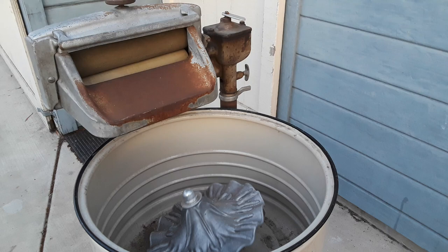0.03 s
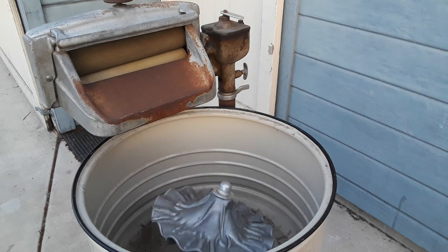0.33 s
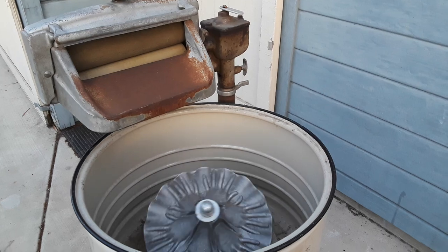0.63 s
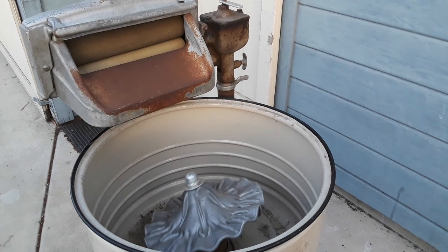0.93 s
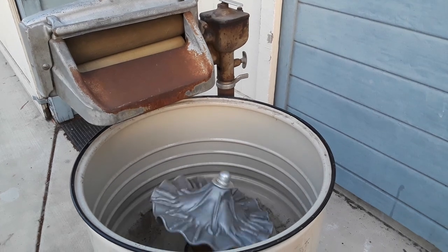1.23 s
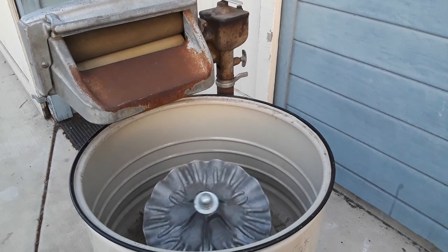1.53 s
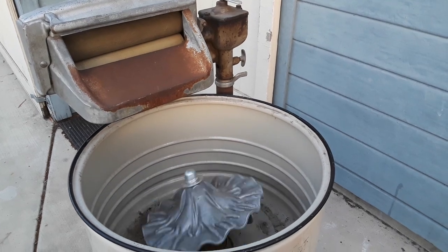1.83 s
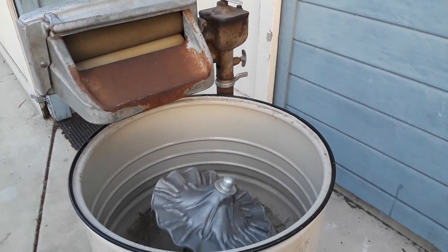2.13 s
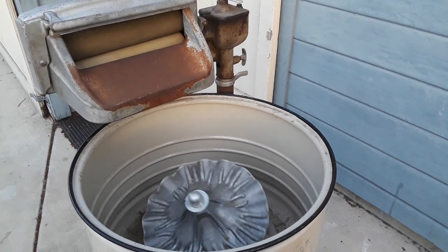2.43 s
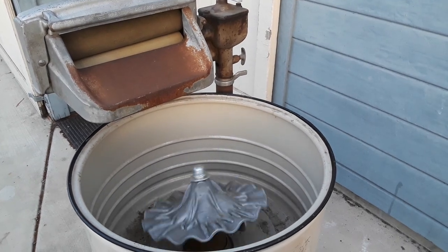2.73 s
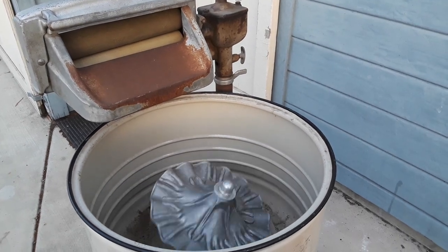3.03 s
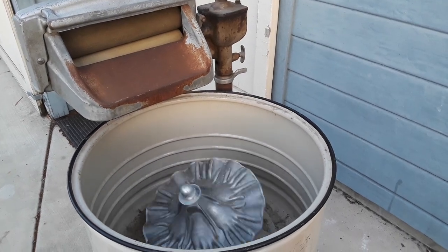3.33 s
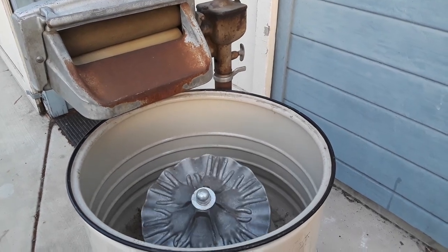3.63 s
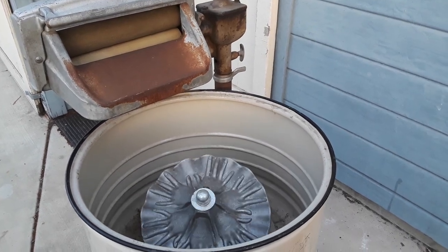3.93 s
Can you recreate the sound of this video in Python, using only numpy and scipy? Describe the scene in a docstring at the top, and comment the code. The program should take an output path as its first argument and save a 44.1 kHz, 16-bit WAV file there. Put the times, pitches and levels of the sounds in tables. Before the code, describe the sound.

An old wringer washer runs empty, droning and churning while a loose metal part chinks.

```python
"""Old wringer washer running empty

Outdoors, from just above the tub. The motor hums and the gear drive makes the tub drone,
swelling as the agitator swings. The gearbox churns, grinds and knocks softly, and its noise
rings the cabinet panels. Close on the left a small loose metal part chinks in irregular
groups over its own faint jingle. A short click comes just before the sound cuts off."""
import sys
import numpy as np
from scipy import signal
from scipy.fft import rfft, irfft
from scipy.io import wavfile

SR = 44100
rng = np.random.default_rng(int(sys.argv[2]) if len(sys.argv) > 2 else 0)


def waveform_to_disk(signal):
    """Save audio, clipped to [-1, 1], as 16-bit WAV at the path in sys.argv[1]."""
    frames = np.transpose(np.atleast_2d(signal))
    scaled = np.clip(frames, -1, 1) * 32767
    samples = np.round(scaled).astype(np.int16)
    wavfile.write(sys.argv[1], SR, samples)


N = 176400
TIME = np.arange(N) / SR
TOP_HZ = 15950

# The motor's steady tones. Each row: frequency in Hz, level in dB.
MOTOR_TONES = [(41,-67.5),(120,-55)]
# Surges of load as the agitator swings. Each row: middle in seconds, length in seconds, relative dB.
LOAD_SURGES = [(0.148,0.071,-26),(0.35,0.055,-32.5),(0.441,0.045,-33),(0.55,0.013,-29),(0.644,0.063,-25.5),(0.823,0.09,-31),(1.117,0.11,-32),(1.308,0.056,-30),(1.537,0.073,-26),(1.737,0.071,-35),(1.95,0.024,-29),(2.022,0.051,-26.5),(2.298,0.031,-32.5),(2.423,0.016,-28.5),(2.465,0.022,-28.5),(2.523,0.047,-28),(2.711,0.061,-31.5),(2.855,.042,-31),(2.93,0.043,-29),(3.005,0.042,-31.5),(3.279,0.052,-36),(3.358,0.022,-28),(3.405,0.01,-28),(3.463,0.04,-29.5),(3.918,0.16,-39)]
# Panel resonances. Each row: pitch in Hz, half-width in Hz, level in dB, left over right in dB.
PANEL_MODES = [(141.2,5.9,-48.5,0.5),(173.4,13.7,-46.5,-0.5),(399.8,13.6,-53.5,-1.5),(605.3,13.3,-54.5,2),(846,5.3,-71.5,18),(1219,21,-61.5,6),(1332,14,-64.5,-1),(1728,25,-66.5,6),(1950,57,-66,-12.5),(2276,43,-63,0)]
# Tone of the churning gears. Each row: frequency in Hz, relative level in dB.
CHURN_EQ = [(30,-20),(42,-14),(62,-4.5),(90,1.5),(125,9.5),(185,2),(225,1.5),(350,2.5),(470,-3.5),(850,-4.5),(1250,-5.5),(2300,-12),(2800,-17.5),(3500,-24.5),(4400,-23.5),(5300,-33),(7300,-27.5),(8800,-45.5),(16000,-39)]
# Fader ride on the churn. Each row: time in seconds, level in dB.
CHURN_FADER = [(.08,-43.5),(.22,-42),(.36,-44.5),(.62,-42.5),(.72,-42.5),(.85,-41),(.95,-43),(1.3,-42.5),(1.62,-45),(1.95,-41.5),(2.05,-42.5),(2.25,-43),(2.45,-44.5),(2.72,-43),(3.12,-43.5),(3.48,-41),(3.6,-45),(4,-43)]
# Lean of the gear noise. Each row: frequency in Hz, left over right in dB.
GEAR_PAN = [(30,0.5),(2300,-1),(3300,8.5),(4500,10.5),(9000,7),(13000,0)]
# Stereo width of the gear noise. Each row: frequency in Hz, side over mid in dB.
GEAR_WIDTH = [(30,-17),(140,-35),(330,-15),(700,-10.5),(1300,-2),(2000,-0.5)]
# Tone of the loose part at each ear. Each row: frequency in Hz, relative level in dB.
METAL_EQ_LEFT = [(1760,-54),(3000,-6),(3500,-26),(4020,-9),(4440,-4),(4900,-15),(5470,-20),(6460,-15),(7050,2),(7430,-2),(8480,-20),(9100,-22.5),(10400,-14),(11100,-4.5),(12600,1),(13700,-6.5),(15100,-13),(15900,-9.5)]
METAL_EQ_RIGHT = [(2800,-29),(4500,1),(5300,-12),(6500,-3),(7250,7.5),(8700,-15),(10800,3.5),(12600,5),(15800,-28)]
# Soft knocks of the drive, except the last row: a short click just before the sound cuts off.
# Each row: start in seconds, relative level in dB, emphasis in Hz.
KNOCK_AND_CLICK_CUES = [(.092,-46,950),(0.151,-48,2000),(.383,-50,1030),(0.423,-51.5,1160),(0.604,-49,2350),(0.841,-51,2300),(1.437,-44,1180),(1.466,-50,2160),(1.516,-48,2330),(2.135,-44,1820),(2.18,-48,1520),(2.238,-49.5,2000),(2.658,-50,1973),(2.889,-47.5,1520),(3.24,-51.5,2235),(3.333,-52.5,1220),(3.442,-46.5,900),(3.868,-51,1998),(3.963,-44.5,2070)]
# Tone of knocks and grinding inside the tub. Each row: frequency in Hz, relative level in dB.
TUB_EQ = [(200,-22),(600,2.5),(1200,2.5),(1800,-1.5),(2350,5),(3000,-8.5),(4500,-18.5),(8000,-28),(16000,-42)]
# Chinks of the loose part. Each row: start in seconds, relative level in dB.
CHINK_CUES = [(.213,-52),(.260,-50),(0.297,-38.5),(0.323,-53),(.380,-47),(0.442,-43.5),(0.638,-50.5),(.705,-41),(0.881,-38.5),(0.923,-46),(0.944,-39),(1.042,-43.5),(1.131,-45),(1.169,-44),(1.209,-42),(1.369,-53),(1.403,-44.5),(1.451,-43),(1.604,-44),(1.633,-49),(1.656,-40),(1.796,-46.5),(1.819,-44.5),(1.899,-38.5),(1.941,-38),(1.977,-43),(2.088,-45.5),(2.111,-44.5),(2.164,-40),(2.244,-49.5),(2.385,-37),(2.420,-36.5),(2.534,-43),(2.558,-39.5),(2.588,-43),(2.682,-37.5),(2.847,-44),(2.859,-39),(2.895,-41),(2.923,-45.5),(3.036,-49.5),(3.134,-43),(3.322,-33),(3.367,-38),(3.396,-51),(3.499,-44.5)]
# The part's clearest partials. Each row: frequency in Hz, relative level in dB.
METAL_MODES = [(4348,-18),(4490,-24),(4600,-16),(5950,-9),(7130,-39),(7290,-26),(11698,-32),(12111,-30)]
# Spells of grinding. Each row: middle in seconds, length in seconds, level in dB, emphasis in Hz.
GRIND_CUES = [(0.423,.035,-55,1150),(0.818,0.1,-48,910),(2.22,0.06,-43.5,950),(2.581,0.16,-51.5,2100),(2.853,0.066,-45,1095),(3.471,0.076,-55,1700)]

METAL_T60_S = 0.13  # decay of the part's dense ring


def amp(db):
    """Decibels to gain."""
    return 10 ** (np.asarray(db) / 20)


def unit(x):
    """Scales to rms 1."""
    return x / np.sqrt(np.mean(abs(x) ** 2) + 1e-20)


def read(points, hz):
    """Reads a table on a log-frequency axis."""
    f, value = np.transpose(points)
    return np.interp(np.log(hz + 1), np.log(f + 1), value)


def add(mix, start_s, sound):
    """Drops a stereo sound into the mix."""
    part = mix[:, round(start_s * SR):][:, :sound.shape[1]]
    part += sound[:, :part.shape[1]]


def equalise(x, eq):
    """Runs x through an EQ curve; rms 1."""
    n = x.shape[-1]
    return unit(irfft(rfft(x) * amp(read(eq, np.fft.rfftfreq(n, 1 / SR))), n))


def wander(rate_hz):
    """Smooth random motion, rms 1."""
    hz = np.fft.rfftfreq(N, 1 / SR)
    return unit(irfft(rfft(rng.standard_normal(N)) / (1 + (hz / rate_hz) ** 4), N))


def spread(pair, gain):
    """Filters two unrelated signals into stereo, tight in the bass and wide in the treble; rms 1."""
    hz = np.fft.rfftfreq(N, 1 / SR)
    mid, side = rfft(pair)
    width, pan = amp(read(GEAR_WIDTH, hz)), amp(read(GEAR_PAN, hz) / 2)
    ears = np.array([(mid + width * side) * pan, (mid - width * side) / pan])
    return unit(irfft(ears * gain / np.hypot(1, width), N))


def swell(middle_s, length_s):
    """A bell-shaped rise and fall."""
    return np.exp(-2 * ((TIME - middle_s) / length_s) ** 2)


def tub_drone(idle_hz=149.5, bend_hz=11, jitter_hz=3, rough=0.22, rough_hz=32):
    """The tub's low ring, shaken unevenly by the gears, lifts in level and pitch with each surge."""
    load = sum(amp(db) * swell(middle, length) for middle, length, db in LOAD_SURGES)
    bend = bend_hz * load / (load + amp(-36))  # half the bend at a load of -36 dB
    hz = idle_hz + bend + jitter_hz * wander(rough_hz)
    shake = 1 + rough * (wander(rough_hz) + 1j * wander(rough_hz)) / np.sqrt(2)
    ring = unit((shake * np.exp(2j * np.pi * np.cumsum(hz) / SR)).real)
    level = np.hypot(load, amp(-43)) * amp(-3)  # the floor keeps it droning between surges
    return level * ring


def motor_hum():
    """The motor holds a steady low hum."""
    return sum(amp(db) * unit(np.sin(2 * np.pi * (hz * TIME + rng.random()))) for hz, db in MOTOR_TONES)


def cabinet_ring(sway_db=1.5, sway_hz=5):
    """Gear noise rings the panels, each resonance swelling and fading on its own."""
    hz, out = np.fft.rfftfreq(N, 1 / SR), np.zeros((2, N))
    for pitch, width, db, pan_db in PANEL_MODES:
        resonance = 1 / (1 + ((hz - pitch) / width) ** 2)
        ring = spread(rng.standard_normal((2, N)), resonance)
        ear_gains = amp([[db + pan_db / 2], [db - pan_db / 2]])
        out += unit(ring * amp(sway_db * wander(sway_hz))) * ear_gains
    return out


def gear_churn(grit_per_s=160, grit_db=-7.5, grit_decay_s=0.0039, flicker_db=1.25, flicker_hz=30):
    """Rubbing noise and a grit of small tooth impacts come through the gear housing."""
    hz = np.fft.rfftfreq(N, 1 / SR)
    hits = (rng.random(N) < grit_per_s / SR) * amp(3 * np.minimum(rng.exponential(1, N), 3))
    envelope = signal.lfilter([1], [1, -np.exp(-1 / (grit_decay_s * SR))], hits)
    grit = unit(envelope * rng.standard_normal((2, N)))
    rubbing = rng.standard_normal((2, N))
    churn = spread(rubbing + amp(grit_db) * grit, amp(read(CHURN_EQ, hz)))
    fader_db = np.interp(TIME, *np.transpose(CHURN_FADER))
    return churn * amp(fader_db + flicker_db * wander(flicker_hz))


def metal_tone(pair, right_db=-12.5):
    """Gives a sound the loose part's bright colour and places it on the left."""
    left, right = equalise(pair[0], METAL_EQ_LEFT), equalise(pair[1], METAL_EQ_RIGHT)
    return np.array([left, amp(right_db) * right])


def metal_jingle(touches_per_s=70, left_db=-66, settle_s=0.17, end_s=3.6):
    """The loose part trembles faintly under the chinks until it settles."""
    touches = (rng.random(N) < touches_per_s / SR) * amp(3 * np.minimum(rng.exponential(1, N), 2))
    power = signal.lfilter([1], [1, -amp(-120 / (METAL_T60_S * SR))], touches ** 2)
    shimmer = metal_tone(np.sqrt(power) * rng.standard_normal((2, N)))
    fade = np.clip((end_s - TIME) / settle_s, 0, 1)
    return amp(left_db) * shimmer * fade


def tub_tone(x, emphasis_hz, boost_db=8, octaves=0.9):
    """Gives a sound the tub's colour, with a broad bell boost; rms 1."""
    hz = np.geomspace(100, SR / 2, num=100)
    bell_db = boost_db * np.exp(-(np.log2(hz / emphasis_hz) / octaves) ** 2)
    return equalise(x, np.transpose([hz, read(TUB_EQ, hz) + bell_db]))


def knocks_and_click(attack_s=0.0018, t60_s=0.21, trim_db=6):
    """Drive slack knocks dully in the tub; the last cue is a short click just before the cut-off."""
    t, out = TIME[:SR // 4], np.zeros((2, N))
    envelope = np.minimum(t / attack_s, 1) * amp(-60 * t / t60_s)
    for start, db, emphasis_hz in KNOCK_AND_CLICK_CUES:
        body = tub_tone(rng.standard_normal((2, len(t))), emphasis_hz)
        add(out, start, amp(db + trim_db) * envelope * body)
    return out


def metal_chinks(attack_s=0.0026, chatter_s=0.0038, mode_t60_s=0.23, wall_db=-21, wall_t60_s=0.19):
    """Each touch chatters into a dense ring that changes with the spot struck; the wall adds a tail."""
    t, out = TIME[:SR // 4], np.zeros((2, N))
    decay = amp(-60 * t / METAL_T60_S) + amp(wall_db - 60 * t / wall_t60_s)
    modes = sum(amp(db) * np.sin(2 * np.pi * (hz * t + rng.random((2, 1)))) for hz, db in METAL_MODES)
    ring = rng.standard_normal((2, len(t))) * decay + modes * amp(-60 * t / mode_t60_s)
    bands_hz = np.linspace(3000, TOP_HZ, num=16)
    trim = amp(0.5) * np.sqrt(np.mean(decay ** 2))
    fade = 1 - t / t[-1]
    for start, db in CHINK_CUES:
        chatter = rng.standard_normal(len(t)) * np.minimum(t / attack_s, 1) * np.exp(-t / chatter_s)
        chatter *= amp(4 * np.minimum(rng.exponential(1, len(t)), 6))  # a few contacts stand out
        spot_ring = ring + 0.69 * rng.standard_normal((2, len(t))) * decay
        chink = signal.fftconvolve(spot_ring, chatter[None], axes=1)[:, :len(t)]
        spot_db = 1.5 * rng.standard_normal(len(bands_hz))
        chink = equalise(chink, np.transpose([bands_hz, spot_db]))
        add(out, start, amp(db) * trim * metal_tone(chink) * fade)
    return out


def shaft_grind(rough_db=3, rough_hz=45):
    """The agitator's shaft rubs unevenly for part of a swing."""
    out = np.zeros((2, N))
    for middle, length, db, emphasis_hz in GRIND_CUES:
        out += amp(db) * swell(middle, length) * tub_tone(rng.standard_normal((2, N)), emphasis_hz)
    return out * unit(amp(rough_db * wander(rough_hz)))


def scene():
    """The machine's running bed with small noises on top, slightly nearer the left ear."""
    bed = tub_drone() + motor_hum() + cabinet_ring() + gear_churn()
    left, right = bed + metal_jingle() + knocks_and_click() + metal_chinks() + shaft_grind()
    return np.array([left, np.roll(right, 3)])  # the right ear hears it 3 samples later


def record(dry, start_s=0.066, fade_s=0.0041):
    """A moment of silence, a snap fade-in and a steep high cut."""
    opened = dry * np.clip((TIME - start_s) / fade_s, 0, 1)
    lowpass = signal.firwin(511, TOP_HZ, window=("kaiser", 9), fs=SR)
    return signal.oaconvolve(opened, lowpass[None], "same")


dry = scene()
out = record(dry)
waveform_to_disk(out)
```